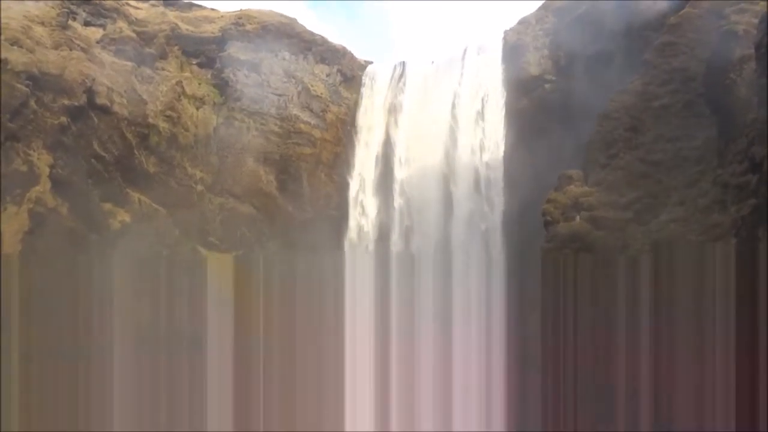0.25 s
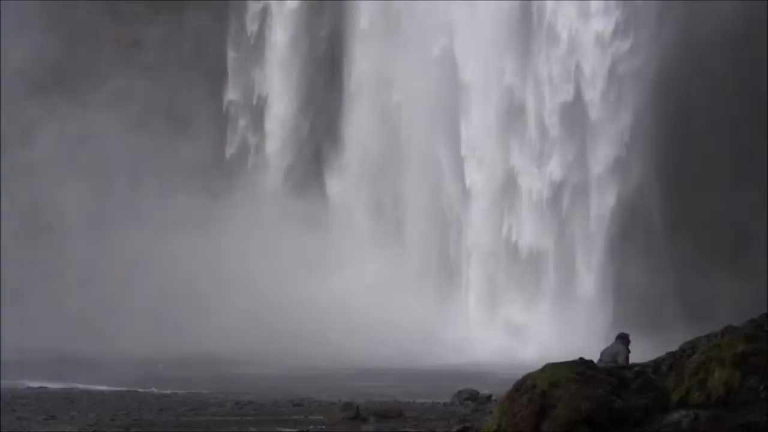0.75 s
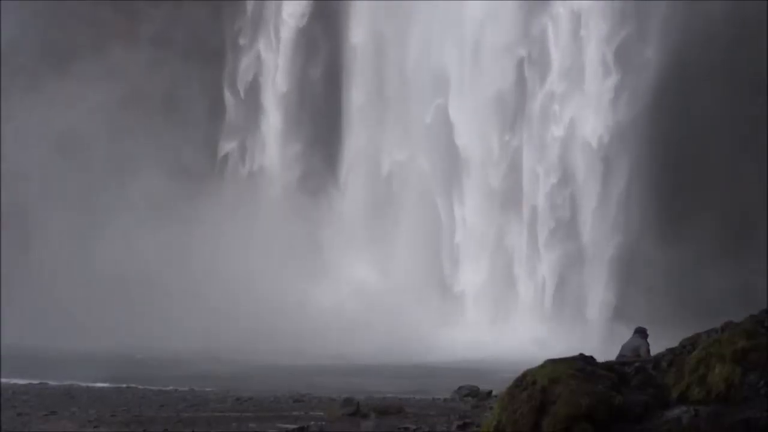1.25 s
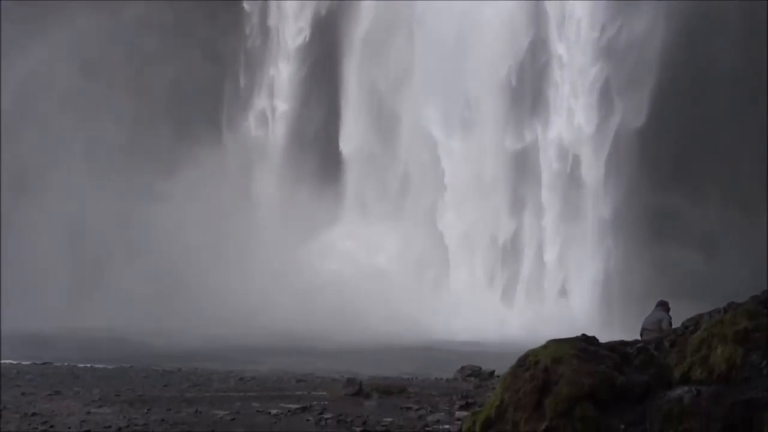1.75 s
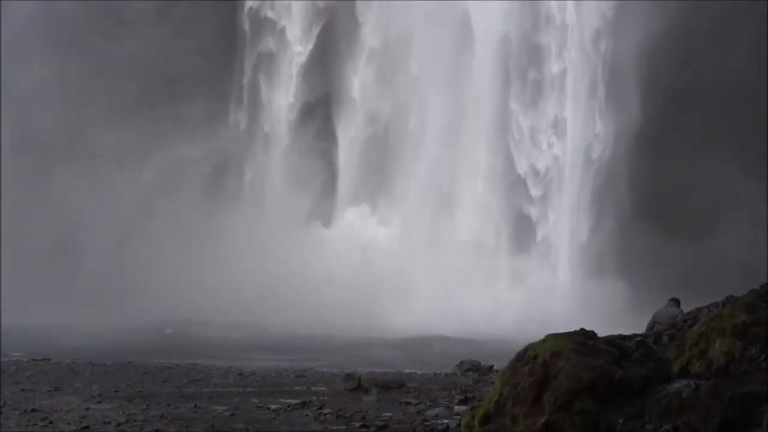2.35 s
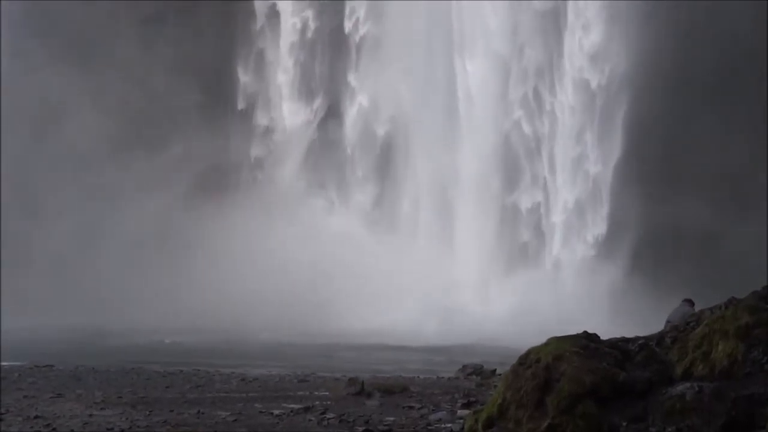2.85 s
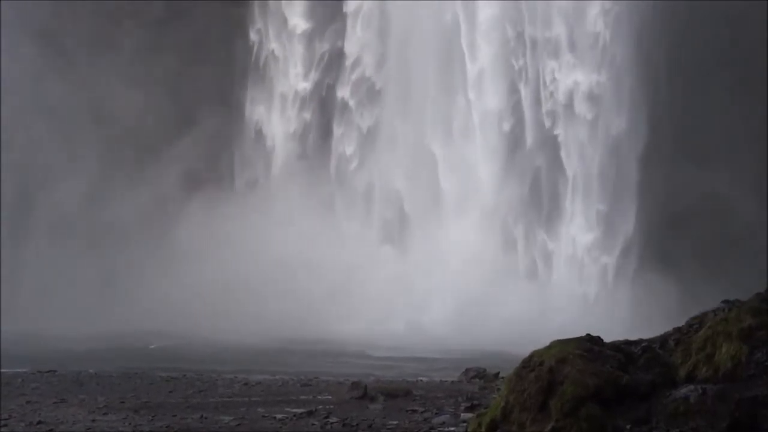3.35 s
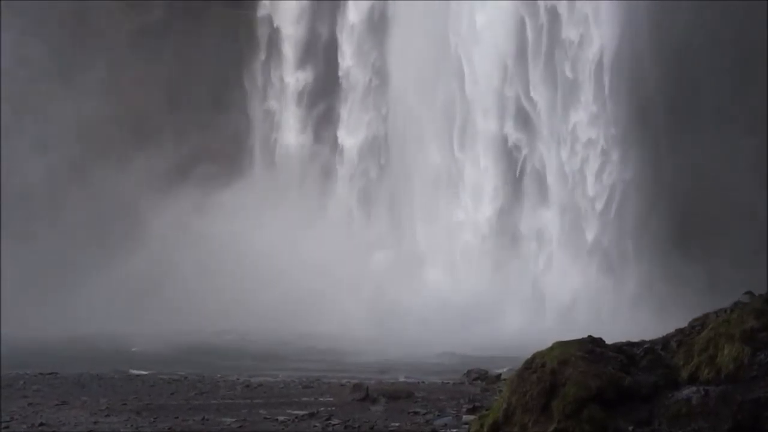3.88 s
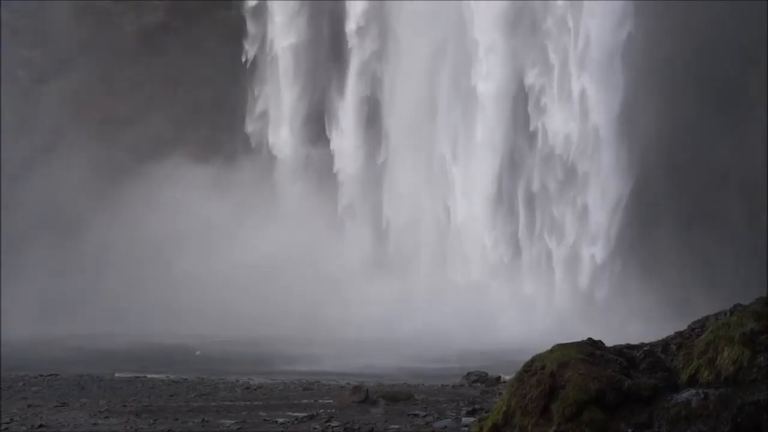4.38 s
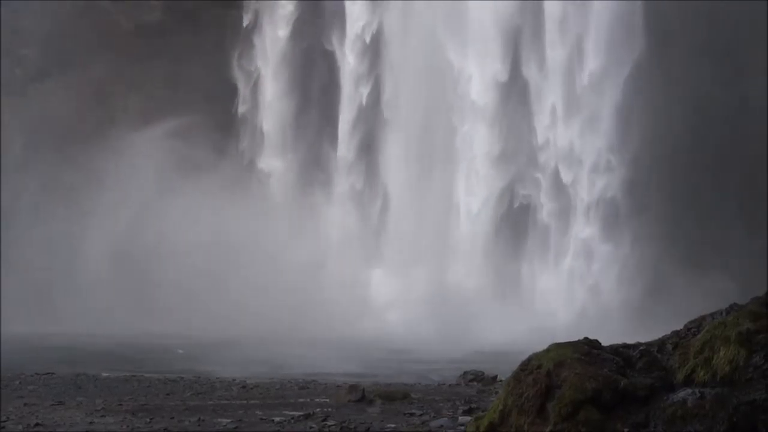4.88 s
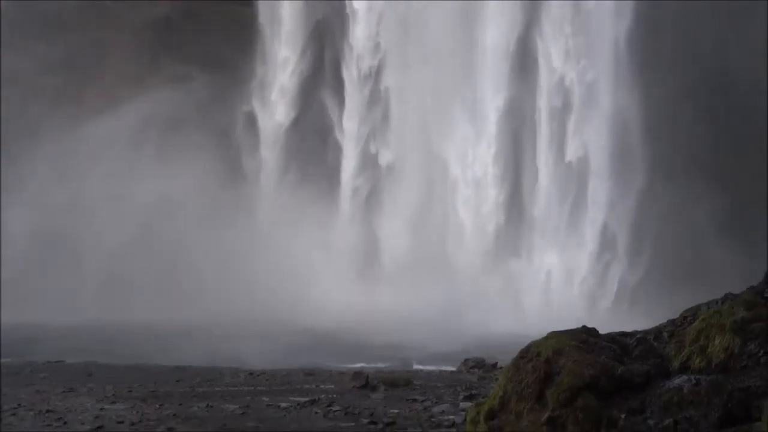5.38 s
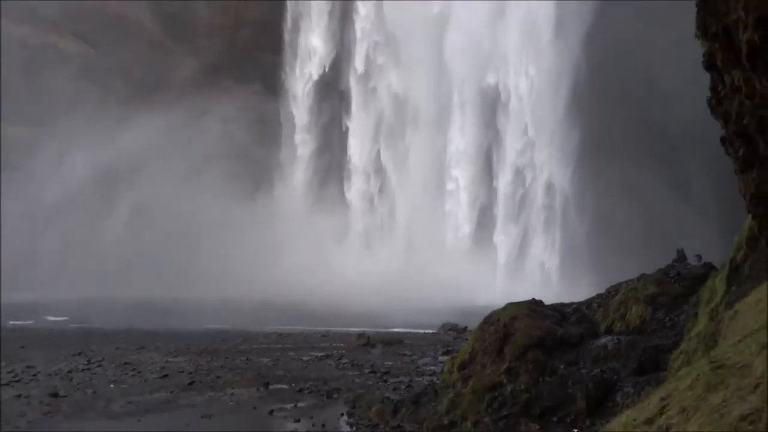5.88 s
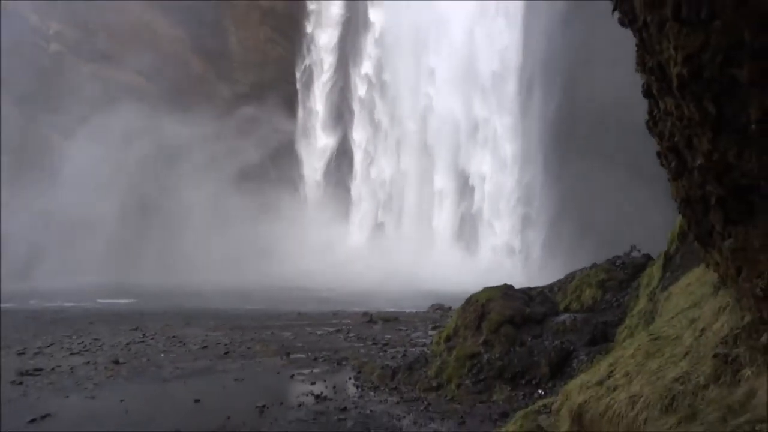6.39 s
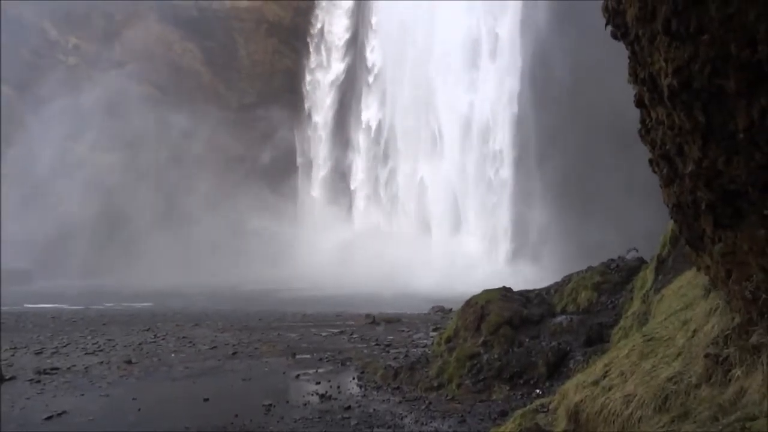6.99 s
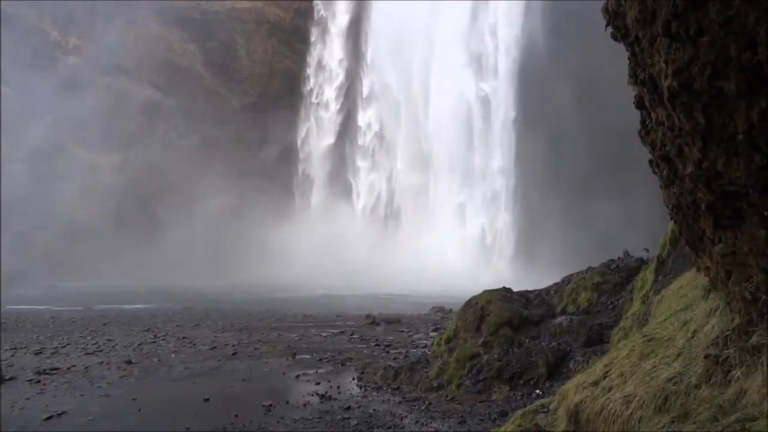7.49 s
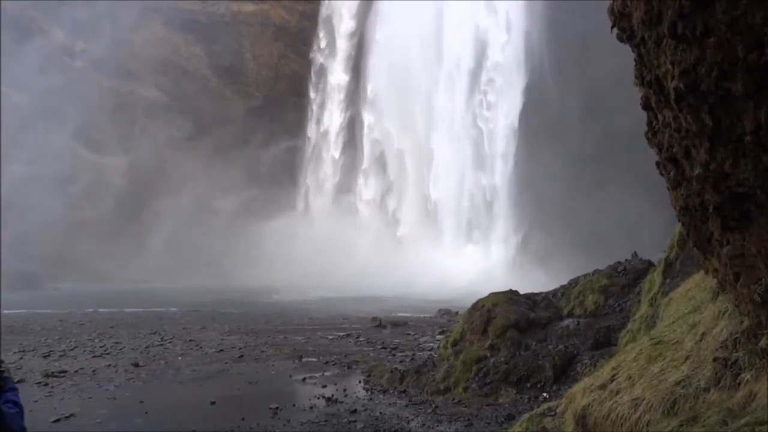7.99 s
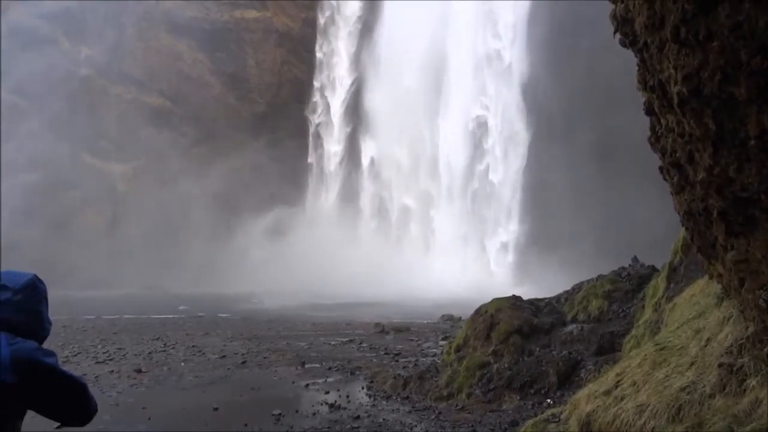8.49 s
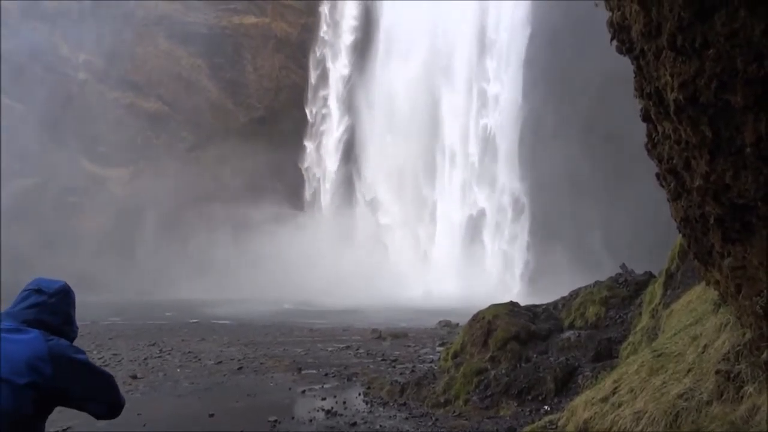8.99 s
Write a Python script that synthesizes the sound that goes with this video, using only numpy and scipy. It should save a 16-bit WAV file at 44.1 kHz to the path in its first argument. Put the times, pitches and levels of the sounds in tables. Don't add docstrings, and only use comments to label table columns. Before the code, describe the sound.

After a faint dull blip and a second of silence, a tall waterfall cuts in abruptly, roaring steadily into a pool with deep rumble and hissing spray.

```python
import sys
import numpy as np
from scipy import signal
from scipy.fft import rfft, irfft, next_fast_len
from scipy.io import wavfile
from scipy.ndimage import uniform_filter1d, map_coordinates

SR = 44100
rng = np.random.default_rng(int(sys.argv[2]) if len(sys.argv) > 2 else 0)


def wav_record(signal):
    frames = np.transpose(np.atleast_2d(signal))
    bounded = np.clip(frames, -1, 1)
    quanta = np.round(bounded * 32767).astype(np.int16)
    wavfile.write(sys.argv[1], SR, quanta)


def field_ratio(decibels):
    return 10 ** (np.asarray(decibels, dtype=float) / 20)


N = 407484

# (frequency [Hz], level [dB per Hz])
TRACE_COLOUR = [(35, -41), (60, -11), (445, 1), (841, -28), (1850, -34), (2520, -38), (4240, -36),
                (6000, -44), (7800, -74), (13200, -120)]
# (time [s], level [dB])
FLOW_STRENGTH = [(1.19, -15), (1.81, -15), (3.03, -13), (3.95, -14.5), (4.73, -13), (4.98, -15.5),
                 (5.76, -13), (6.23, -14), (7.2, -13), (7.36, -16), (8.43, -13.5), (8.68, -14.5),
                 (9.13, -12.5), (9.24, -15.5)]
# (time [s], swell [dB])
HEAVES = [
    (2.4, 1.5),
    (2.75, 2.5),
    (3.6, 1),
    (5.3, 1),
    (6.15, 2),
    (6.6, 1.5),
    (8.1, 1.5),
    (8.6, 2.5),
    (9.05, -0.5),
]
# (frequency [Hz], level [dB per Hz])
FALL_COLOUR = [(12, -39), (20, -7.5), (64, -5.5), (109, 0), (252, -2.5), (441, -7.5), (599, -5),
               (837, -7.5), (1420, -9), (1730, -8), (3280, -8.5), (4100, -10), (9190, -21.5),
               (12100, -27.5), (15600, -38)]
# (frequency [Hz], level [dB per Hz])
CLIFF_COLOUR = [(12, -47), (20, -23), (114, -5), (245, -1.5), (388, -5), (599, -4.5), (1360, -9.5),
                (4870, -12.5), (7530, -22.5), (9000, -25.5), (11700, -53), (19800, -120)]
# (time [s], peak level [dB], pitch [Hz])
SLAPS = [
    (4.055, -13.5, 706),
    (4.1, -14, 477),
    (4.69, -17, 470),
    (6.14, -17, 556),
    (7.38, -18, 600),
    (8.93, -13, 620),
    (9.11, -19, 774),
]
# (time [s], peak level [dB], centre [Hz], width [Hz], t60 [s])
DROPS = [
    (6.281, -24, 10000, 4000, .008),
    (6.665, -41, 14500, 2000, .15),
    (7.0765, -4, 5700, 2200, 0.0056),
    (7.076, -25, 9500, 3500, .03),
    (7.2135, -17, 11600, 1800, .008),
    (7.205, -36, 12500, 4000, .12),
]
# (frequency [Hz], phase [rad])
PORT_LEAD = [(0, 0.19), (520, -0.37), (3190, -0.21), (16100, 0.0)]
# (frequency [Hz], left minus right [dB])
PORT_TILT = [(60, 0.5), (110, 1), (200, 0.5), (380, 0.5), (700, 0.0), (1290, 0.0), (2380, -0.5),
             (4400, -0.5), (8120, 0.5), (15000, -2)]


def unit(x):
    return x / np.sqrt(np.mean(x ** 2) + 1e-20)


def along(points, hz):
    point_hz, value = np.transpose(points)
    return np.interp(np.log(hz + 1), np.log(point_hz + 1), value)


def ramp(start_s, length_s):
    return np.clip((np.arange(N) / SR - start_s) / length_s, 0, 1)


def wobble(rate):
    return map_coordinates(rng.standard_normal(N // 100), [np.arange(N) * rate / SR])


def filtered(x, response):
    size = next_fast_len(N + 8192)
    spectrum = rfft(x, size) * response(np.fft.rfftfreq(size, 1 / SR))
    return irfft(spectrum, size)[..., :N]


def above(hz, edge_hz):
    return 1 / (1 + (edge_hz / (hz + 1)) ** 6)


def trace():
    t = np.arange(N) / SR
    level_db = -53 - 900 * np.clip(t - .008, 0, 1)
    end_s = .027
    fading = field_ratio(level_db) * (1 - ramp(end_s / 2, end_s / 2))
    air = filtered(rng.standard_normal(N), lambda hz: field_ratio(along(TRACE_COLOUR, hz)))
    return fading * unit(air)


def cut_in():
    scrap_s, scrap_length_s = .9954, .0088
    leak_db, leak_s = -40, .004
    attack = ramp(scrap_s, 1 / 2000) + field_ratio(leak_db) * ramp(scrap_s - leak_s, leak_s)
    scrap = attack * (1 - ramp(scrap_s + scrap_length_s, .0016))
    real_start = ramp(1.0072, .021)
    excess_db = 4.4 * (1 - ramp(1.1, .05))
    return (scrap + real_start) * field_ratio(excess_db)


def patchy(depth_db):
    cells = signal.stft(rng.standard_normal((2, N)), nperseg=512)[2]
    field = rng.standard_normal(cells.shape[1:])
    field = uniform_filter1d(uniform_filter1d(field, size=6, axis=0), size=12, axis=1)
    return signal.istft(cells * field_ratio(depth_db * unit(field)), nperseg=512)[1][:, :N]


def water(source, share, wide_db):
    def colour(hz):
        return np.sqrt(share(hz)) * field_ratio([along(FALL_COLOUR, hz), along(CLIFF_COLOUR, hz) + wide_db])
    pair = filtered(source, colour)
    return pair / np.std(pair[0])


def rumble(mean_db, swing_db, heave_db, surge):
    level_db = mean_db - 9.5 + 1.3 * swing_db + heave_db
    level_db = level_db + 0.6 * wobble(6) + 0.41 * surge
    return field_ratio(level_db) * water(patchy(0.65), lambda hz: 1 - above(hz, 183), wide_db=-20)


def boom(mean_db, swing_db, heave_db, surge):
    level_db = mean_db - 8.5 + 1.4 * swing_db + 0.32 * heave_db
    level_db = level_db + 0.6 * wobble(3) + 1.4 * surge
    return field_ratio(level_db) * water(patchy(0.13), lambda hz: above(hz, 202) * (1 - above(hz, 387)), wide_db=-17)


def roar(mean_db, swing_db, surge):
    level_db = mean_db - 1.06 + swing_db + surge
    return field_ratio(level_db) * water(patchy(0.52), lambda hz: above(hz, 407) * (1 - above(hz, 5040)), wide_db=-14)


def splashes(rate):
    when, size, sign = rng.random((40000, 3)).T
    keep = np.arange(len(when)) < rate * N / SR
    force = keep * np.sign(sign - .5) * field_ratio(1.5 * np.log(size + 1e-6))
    return unit(np.bincount((when * N).astype(int), force, N))


def spray(mean_db, swing_db, surge):
    fizz = patchy(0.3) + field_ratio(-18.5) * splashes(rate=830) * [[1], [0]]
    level_db = mean_db - 7 + 0.97 * swing_db + 0.86 * surge
    level_db = level_db + 0.28 * wobble(30)
    return field_ratio(level_db) * water(fizz, lambda hz: above(hz, 5340), wide_db=-13.5)


def waterfall():
    t = np.arange(N) / SR
    strength_db = np.interp(t, *np.transpose(FLOW_STRENGTH))
    mean_db = strength_db.mean()
    swing_db = strength_db - mean_db
    heave_db = sum(db * np.exp(-((t - s) / 0.19) ** 2) for s, db in HEAVES)
    surge = 0.27 * wobble(5.5) + 0.092 * wobble(14)
    low = rumble(mean_db, swing_db, heave_db, surge) + boom(mean_db, swing_db, heave_db, surge)
    return low + roar(mean_db, swing_db, surge) + spray(mean_db, swing_db, surge)


def puffs(events, rise_s, boost_db):
    out, t = np.zeros(N + SR), np.arange(SR // 5) / SR
    for s, db, hz, width_hz, t60 in events:
        pole = np.exp(-2 * np.pi * width_hz / SR)
        shiver = signal.lfilter([1], np.poly([pole, pole, pole]), rng.standard_normal(len(t)))
        puff = unit(shiver) * np.sin(2 * np.pi * hz * t) * (1 - np.exp(-t / rise_s))
        out[round(s * SR):][:len(t)] += field_ratio(db + boost_db - 60 * t / t60) * puff
    return out[:N]


def slaps():
    events = [(s, db, hz, .16 * hz, .21) for s, db, hz in SLAPS]
    return puffs(events, rise_s=.009, boost_db=4)


def drops():
    return puffs(DROPS, rise_s=.001, boost_db=12.5)


def scene():
    centre, side = waterfall()

    def left(hz):
        return field_ratio(along(PORT_TILT, hz) / 2) * np.exp(.5j * along(PORT_LEAD, hz))
    near = centre + slaps() + drops()
    ports = filtered(near, lambda hz: np.array([left(hz), 1 / left(hz)]))
    return (ports + side * [[1], [-1]]) * cut_in() + trace() * field_ratio([[-.6], [.6]])


def low_pass(x):
    return signal.sosfilt(signal.butter(12, 15740, fs=SR, output="sos"), x)


def record(dry):
    mix = dry / (1 + np.abs(dry) ** 8) ** (1 / 8)
    return low_pass(mix)


dry = scene()
out = record(dry)
wav_record(out)
```